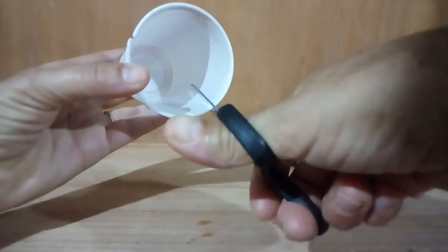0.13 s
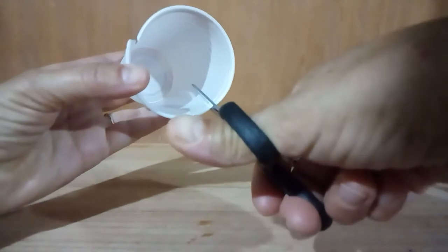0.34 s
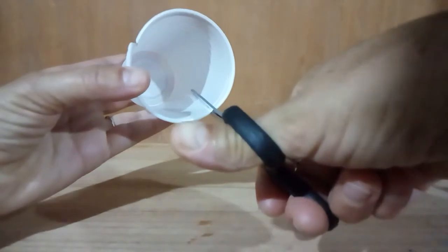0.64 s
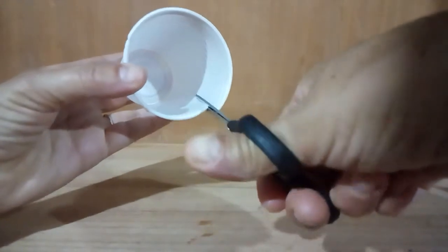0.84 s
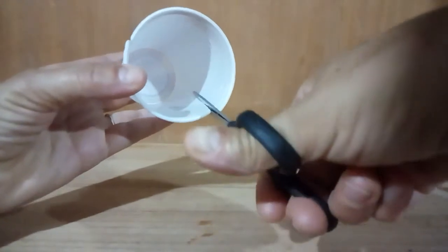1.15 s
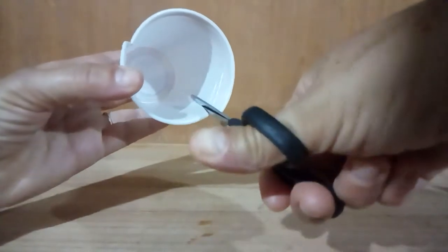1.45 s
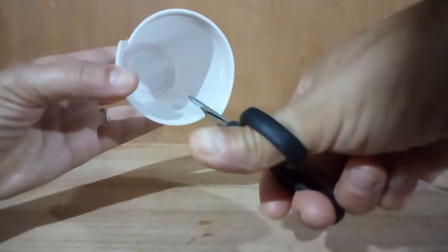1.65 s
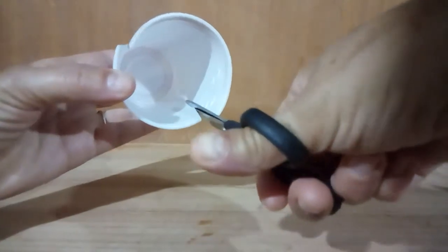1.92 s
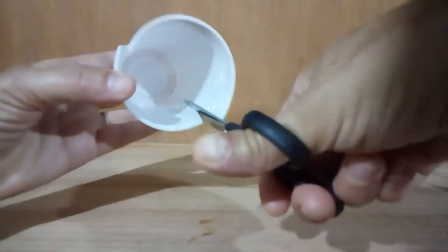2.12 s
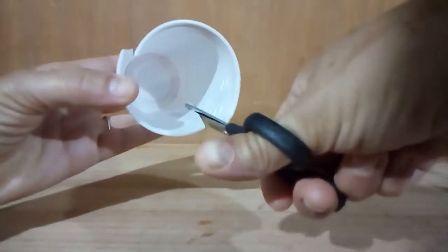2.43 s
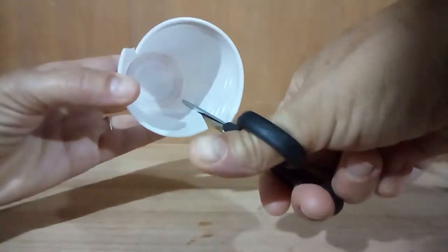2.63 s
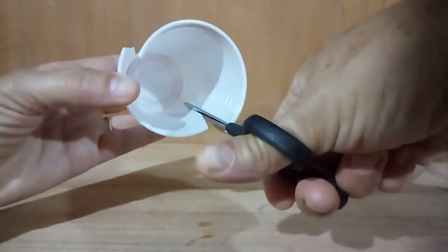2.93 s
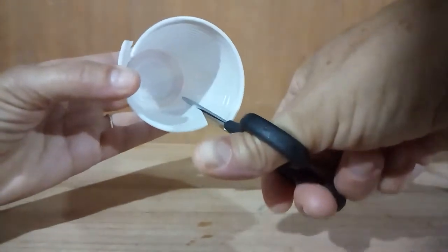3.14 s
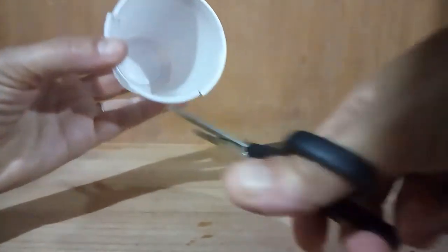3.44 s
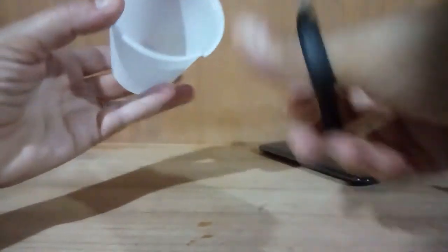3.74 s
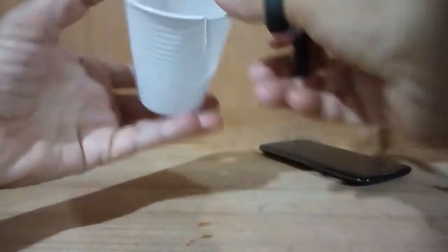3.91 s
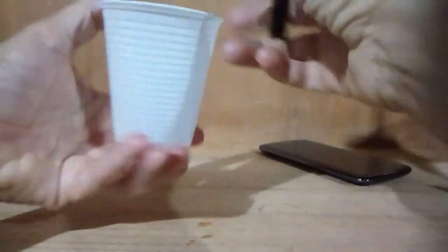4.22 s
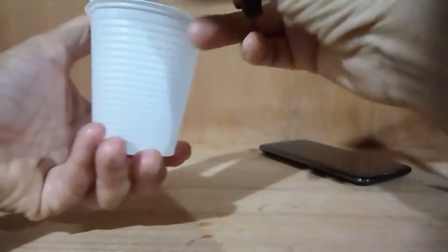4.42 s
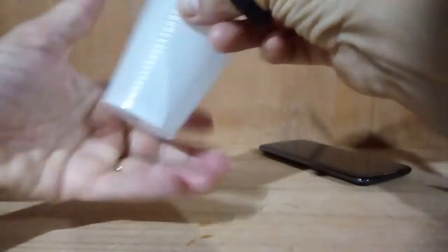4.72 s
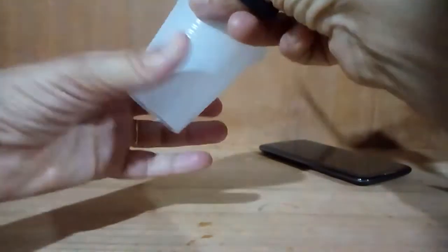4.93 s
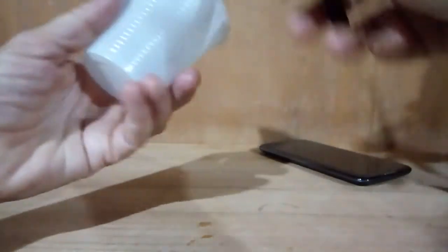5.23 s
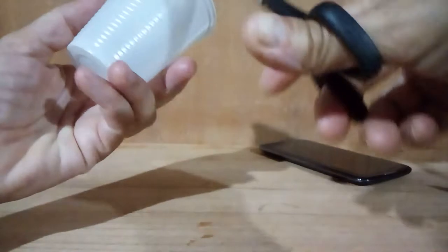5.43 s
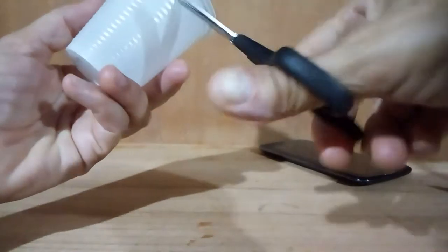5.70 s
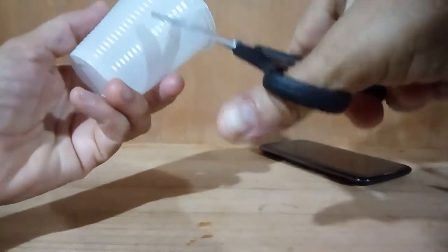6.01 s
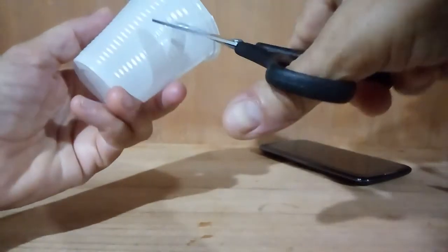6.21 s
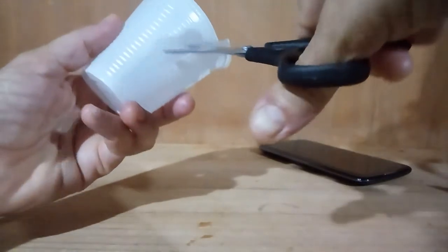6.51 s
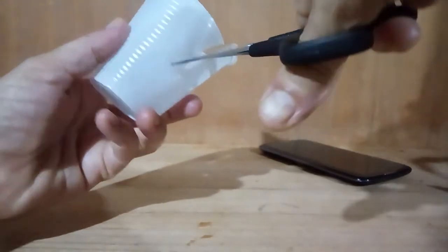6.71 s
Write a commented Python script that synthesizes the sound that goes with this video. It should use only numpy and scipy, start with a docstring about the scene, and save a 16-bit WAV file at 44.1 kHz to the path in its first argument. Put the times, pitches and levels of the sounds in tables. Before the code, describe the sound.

A soft fan-like drone with low, wavering tones fills a small room throughout, with a faint hiss. At about 0.9 seconds small scissors bite into a thin plastic cup close to the microphone with a sharp crack. Quick runs of bright snaps and crackles follow until 2 seconds, then lighter snips and scraping as blades and fingers stick and slip over the ribs. At 3 seconds comes a loud snap and a very brief low hum from the cup, followed by the densest, loudest cracking from 3.2 to 3.5 seconds. The background dips slightly after the loud snaps. Faint ticks and rubbing continue until about 4.6 seconds, when a duller cluster of crackles starts, lasting to around 5.5. More rubbing and scattered snaps come near 5.9 and 6.1, with a stronger snap at 6.4 and a few small ones near 6.8 seconds.

```python
"""A fan-like drone with soft tones fills a small room; then small scissors snip a thin plastic cup
close to the microphone. The wall snaps and buckles in runs of tiny cracks, and blades and fingers
stick and slip over its ribs. Both ring the same cup: base, hollow, flank and thin wall.
Midway the base hums briefly; later the snaps and rubbing are duller, their low ring near the
drone's pitch. The microphone hisses faintly, and its gain control ducks after loud snaps."""
import sys
import numpy as np
from scipy import signal
from scipy.io import wavfile
from scipy.ndimage import uniform_filter1d

SR = 44100
rng = np.random.default_rng(int(sys.argv[2]) if len(sys.argv) > 2 else 0)


def wav_record(signal):
    """Record a signal, one row per channel, as 16-bit PCM in the file named by sys.argv[1]."""
    frames = np.transpose(np.atleast_2d(signal))
    bounded = np.clip(frames, -1, 1)
    # unit amplitude maps onto the largest positive 16-bit level
    quanta = np.round(bounded * 32767).astype(np.int16)
    wavfile.write(sys.argv[1], SR, quanta)


N = 302526

# The cup's modes, zone by zone from low to high. Each row: pitch in Hz, width in Hz, level in dB.
BASE_MODES = [(339, 58, -5.5), (459.4, 47, -3), (571, 183, 2.5), (787, 190, 6.5), (970, 100, -2.5)]
HOLLOW_MODES = [(1050, 61, -7.5), (1298, 71, 3.5), (1486, 91, -1), (1678, 90, -0.5), (1854, 460, -3)]
FLANK_MODES = [(2062, 570, 0), (2580, 530, -1), (2897, 290, -1), (3154, 210, -6.5), (3560, 216, -2.5),
               (3918, 440, -1), (4370, 490, 2.5)]
WALL_MODES = [(4790, 495, -1.5), (5485, 254, -2), (5880, 210, -3), (6230, 300, -1.5), (6730, 314, -1),
              (7410, 150, -17)]
# After DULL_FROM_S the snaps and rubbing are duller, their low ring near the drone's pitch.
DULL_FROM_S, BASE_EARLY_HZ, BASE_LATE_HZ = 3.48, 784, 380


def gain_of(db):
    """Turns dB into amplitude."""
    return 10 ** (np.asarray(db) / 20)


def unit_rms(x):
    """Scales to rms 1."""
    return x / np.sqrt(np.mean(x ** 2) + 1e-20)


def curve_at(points, hz):
    """Reads a curve on a log-frequency axis."""
    f, value = np.transpose(points)
    return np.interp(np.log(hz + 1), np.log(f + 1), value)


def drift(count, samples):
    """Rows of slow random movement of rms 1, smoothed over the given number of samples."""
    white = rng.standard_normal((count, N))
    return unit_rms(uniform_filter1d(uniform_filter1d(white, samples), samples))


def shaped_noise(spectrum, rms_db, patchy_db):
    """Coloured noise in which patches of the spectrum swell and fade."""
    hz = np.fft.rfftfreq(2048, 1 / SR)
    real, imag, patches = rng.standard_normal((N // 512 + 5, 1025, 3)).T
    patches = unit_rms(uniform_filter1d(uniform_filter1d(patches, size=14, axis=0), size=12, axis=1))
    frames = (real + 1j * imag) * gain_of(curve_at(spectrum, hz)[:, None] + patchy_db * patches)
    return gain_of(rms_db) * unit_rms(signal.istft(frames, nperseg=2048, noverlap=1536)[1][:N])


def drone():
    """A fan-like bed of smooth noise, with soft tones whose strength and phase wander."""
    # The bed's colour. Each row: frequency in Hz, relative level in dB.
    spectrum = [(12, -51), (20, -17.5), (123, 3), (250, -14.5), (370, -6.5), (418, -4.5), (521, -12),
                (771, -15.5), (1170, -22), (3890, -30), (5900, -26), (7000, -34), (9100, -69),
                (15400, -120)]
    # The tones. Each row: pitch in Hz, width of the waver in Hz, unsteady share, rms level in dB.
    tones = [(122.4, 13, 1, -65), (328, 76, 1., -66.5), (424.4, 30, .4, -61.5)]
    out, t = shaped_noise(spectrum, rms_db=-58.5, patchy_db=2.5), np.arange(N) / SR
    for hz, waver_hz, unsteady, db in tones:
        pole = np.exp(-np.pi * waver_hz / SR)
        wander = signal.lfilter([1], [1, -2 * pole, pole ** 2], rng.standard_normal((2, N)))
        waver = (unit_rms(wander[0]) + 1j * unit_rms(wander[1])) / np.sqrt(2)
        swell = gain_of(2.7 * drift(count=1, samples=6000)[0])
        envelope = (1 - unsteady + unsteady * waver) * swell
        out += gain_of(db) * unit_rms((envelope * np.exp(2j * np.pi * hz * t)).real)
    return out


def ticks(shape, density, spread_db):
    """Scattered ticks of random sign and uneven size."""
    size = gain_of(spread_db * np.minimum(rng.exponential(1, shape), 5))
    return size * rng.choice([-1., 1.], shape) * (rng.random(shape) < density)


def ring(modes, near_hz=None):
    """Each mode's ring after one tick, a row each; modes close to near_hz are favoured."""
    hz, width, db = np.transpose(modes)[:, :, None]
    if near_hz:
        db = db - 1.4 * abs(hz - near_hz) / width
    t = np.arange(2048) / SR
    polarity = (-1) ** np.arange(len(modes))[:, None]
    attack = 1 - np.exp(-(t / .00025) ** 2)  # the plastic gives for an instant
    return attack * polarity * gain_of(db) * np.exp(-np.pi * width * t) * np.sin(2 * np.pi * hz * t)


def rasp(brightness):
    """The bright edge of a tick, which dies without ringing; brightness 0-1 blends slip into crack."""
    # The colours of a hard crack and of a gentle slip. Each row: frequency in Hz, level in dB.
    crack = [(4410, -30), (7500, 0), (7890, -4), (11500, -21), (13500, -25), (14000, -17), (15300, -10),
             (16000, -14), (16700, -34)]
    slip = [(4400, -30), (7500, 0), (8500, -8), (10000, -19), (12000, -30), (14000, -36), (15000, -30),
            (16000, -36), (16700, -55)]
    hz = abs(np.fft.fftfreq(4096, 1 / SR))
    colour = gain_of(brightness * curve_at(crack, hz) + (1 - brightness) * curve_at(slip, hz))
    minimum_phase = np.exp(np.conj(signal.hilbert(np.log(colour))))  # keeps the attack sharp
    return np.fft.ifft(minimum_phase).real[None, :2048]


def snaps():
    """The wall snaps: each run of tiny cracks swells, dies and shakes the zones of the cup."""
    # Each row: start in seconds, rough peak level of the thin wall in dB, rms levels of base, hollow
    # and flank in dB relative to it, pitch of the wall in Hz.
    hits = [(0.296, -55.5, -15, -13, -11.5, 5690), (0.879, -16, -28, -38, -23, 6710),
            (0.8823, -7, -30.5, -25, -25.5, 6400), (0.8877, -14, -43, -19.5, -15, 5650),
            (1.1198, -21, -30.5, -29, -15, 5360), (1.1448, -14.5, -25.5, -14, -15, 6700),
            (1.1682, -20.5, -23, -41, -16, 6640), (1.1972, -21.5, -28, -40, -17, 6330),
            (1.2037, -6, -56, -44, -27, 6600), (1.2826, -25, -13, -7, -12.5, 6070),
            (1.291, -17, -25.5, -15, -19, 6700), (1.3195, -19, -29, -50, -25.5, 6400),
            (1.403, -35.5, -13, -18, -18, 5690), (1.4212, -34.5, -10, -16, -8, 6530),
            (1.4266, -18.5, -29, -20, -33, 5650), (1.492, -37, -8, -9.5, -16, 6130),
            (1.5882, -55, 9.5, 4.5, -2.5, 5670), (1.6724, -15.5, -17, -11.5, -6.5, 6100),
            (1.8871, -21.5, -19, -13.5, -12, 6060), (1.9023, -42.5, -15, -3, -8.5, 6190),
            (1.9905, -15, -17.5, -22, -20.5, 6000), (2.0176, -21, -17.5, -26, -19, 5900),
            (2.4012, -35.5, -36, -37, -35, 6170), (2.4364, -33, -24, -27, -17.5, 6350),
            (2.6191, -25.5, -32, -22.5, -25.5, 5300), (2.668, -32.5, -9.5, -10.5, -13, 6260),
            (2.684, -26, -20.5, -31, -18.5, 6200), (3.0049, -5.5, -32.5, -22.5, -22.5, 6220),
            (3.244, -20.5, -26, -22.5, -22, 6400), (3.272, -5.5, -31, -26.5, -26, 5600),
            (3.2983, -14.5, -31, -27, -17, 4740), (3.3093, -6, -31, -29, -22, 6400),
            (3.3149, -3.5, -29, -21, -21.5, 5400), (3.3492, -16, -19.5, -11, -13.5, 5630),
            (3.3591, -8.5, -36, -20, -22, 6780), (3.4054, -15, -20.5, -13, -18, 5500),
            (3.44, -13.5, -26, -30, -10.5, 5730), (3.4945, -21.5, -38, -27, -16.5, 5340),
            (3.6173, -45, -23, -41, -23.5, 7000), (3.743, -42, -21, -32, -21, 5980),
            (3.7988, -38.5, -33, -38, -26, 5950), (3.918, -41, -19.5, -27.5, -12.5, 5760),
            (4.6187, -28.5, -44, -26.5, -23.5, 6310), (4.6558, -37.5, -38, -25, -14, 6700),
            (4.705, -25, -45, -20, -27, 7400), (4.7122, -32, -16.5, -7, -3, 5200),
            (4.7352, -23.5, -26, -17.5, -20, 5160), (4.7784, -26.5, -26, -26, -27, 5700),
            (4.8101, -31.5, -33, -18, -9.5, 4700), (4.9066, -22, -30, -23, -14.5, 5330),
            (4.9364, -27, -24, -23, -17, 5770), (5.0606, -29, -19, -16.5, -15, 6000),
            (5.1236, -30.5, -21, -26, -15, 6000), (5.1324, -13.5, -30.5, -18, -14.5, 5500),
            (5.242, -52.5, -14, 0.5, -4, 5400), (5.3135, -36.5, -45, -38, -15, 6300),
            (5.443, -29, -27.5, -16.5, -14, 5380), (5.7823, -38, -38, -18, -23, 5420),
            (5.913, -26.5, -24, -12.5, -27, 5910), (5.9231, -27.5, -13, -13.5, -14, 4890),
            (6.096, -24, -33.5, -31, -21, 4700), (6.2672, -56, -12.5, -6, -8, 5470),
            (6.339, -55, -5, 4, -2.5, 4830), (6.3715, -14.5, -16.5, -13.5, -17.5, 6500),
            (6.7551, -39.5, -26, -10.5, -8, 5760), (6.774, -30.5, -26.5, -21, -12.5, 5640),
            (6.7894, -36, -18, -28, -11, 5700)]
    crackle_t60_s, rasp_db = 0.041, -30.5  # rasp relative to the wall
    late_dulling, late_rasp_db = 0.45, -2.5  # late snaps have a darker, softer rasp
    out, t = np.zeros(N + 8192), np.arange(4096) / SR
    cracks = ticks((len(hits), 5, 4096), density=0.28, spread_db=3.)
    for (start, db, base_db, hollow_db, flank_db, wall_hz), crack in zip(hits, cracks):
        late = start > DULL_FROM_S
        edge = rasp(np.clip((db + 25) / 14 - late_dulling * late, 0, 1))  # hard snaps are brighter
        rise_s = 0.00034 * gain_of(-.35 * db)  # and start more abruptly
        cup = (ring(BASE_MODES, BASE_LATE_HZ if late else BASE_EARLY_HZ),
               ring(HOLLOW_MODES, near_hz=1390), ring(FLANK_MODES, near_hz=0.61 * wall_hz),
               edge, ring(WALL_MODES, wall_hz))
        crackle = crack * np.minimum(t / rise_s, 1) * gain_of(-60 * t / crackle_t60_s)
        shaken = signal.fftconvolve(crackle, [zone.sum(axis=0) for zone in cup], axes=1)
        strength = np.sqrt(np.mean(shaken[:, :700] ** 2, axis=1))
        strength[-1] = 3.24 * np.sqrt(np.mean(shaken[-1, :300] ** 2))  # the wall's opening crest
        zone_db = np.array([base_db, hollow_db, flank_db, rasp_db + late_rasp_db * late, 0])
        at = round(start * SR)
        out[at:at + shaken.shape[1]] += gain_of(db + zone_db) / strength @ shaken
    return out[:N]


def wall_sheen(x):
    """Sharp modes of the thin wall add a fine ring to whatever shakes the cup."""
    # Each row: pitch in Hz, width in Hz (widened to at least 25), level in dB over the passing sound.
    sharp_modes = [(1532, 23, 0), (1740, 20, -1), (2090, 30, 4), (2596, 32, 1), (2998, 34, 0),
                   (3250, 34, -1), (3478, 23, 0), (4227, 31, 0.5), (4783, 40, 2), (5150, 31, 3),
                   (5360, 20, -3.5), (5820, 27, 2.5), (6140, 79, -1.5), (6480, 26, 2)]
    hz, width, db = np.transpose(sharp_modes)[:, :, None]
    t, width = np.arange(4096) / SR, np.maximum(width, 25)
    decays = gain_of(db) * 2 * np.pi * width / SR * np.exp(-np.pi * width * t)
    ringing = (decays * np.cos(2 * np.pi * hz * t)).sum(axis=0)
    return x + signal.oaconvolve(x, ringing)[:N]


def room(x):
    """Sparse reflections off the walls of a small room, the treble dying first."""
    # Each row: frequency in Hz, time to fade by 60 dB in seconds.
    decay_times = [(300, 0.26), (1500, 0.24), (5500, 0.17), (12000, 0.14)]
    taps, slots = np.zeros((3, SR // 2)), np.arange(200, SR // 2 - 20, 20)
    arrivals = slots + rng.integers(0, 20, (3, len(slots)))
    np.put_along_axis(taps, arrivals, rng.choice([-1., 1.], arrivals.shape), axis=1)
    hz, t, frames = signal.stft(taps, SR, nperseg=256)
    fade = gain_of(-60 * t / curve_at(decay_times, hz)[:, None])
    tails = signal.istft(frames * fade, SR, nperseg=256)[1]
    tails /= np.linalg.norm(tails[0])
    # Three random tails alternate rapidly so the echo stays smooth, without a fixed ring.
    turns = np.sqrt(2 / 3) * abs(np.cos(np.pi * (np.arange(N) / 300 + np.arange(3)[:, None] / 3)))
    return signal.fftconvolve(turns * x, tails, axes=1)[:, :N].sum(axis=0)


def drag():
    """Blades and fingers stick and slip over the ribs: dense ticks in clumps ring the cup."""
    # Each row: strongest moment, rise and fall in seconds, rms level of the thin wall in dB,
    # levels of base, hollow and flank in dB relative to it.
    strokes = [(0.938, 0.042, 0.12, -35.5, -13.5, -16, -7.5), (1.265, 0.055, 0.035, -36.5, -10, -9.5, -5.5),
               (1.705, 0.039, 0.12, -46, -6, -7, 6.5), (1.975, 0.034, 0.024, -56, 5.5, 2, -1),
               (2.235, 0.067, 0.062, -31.5, -8, -12.5, -11.5), (2.442, 0.023, 0.023, -42.5, -6, -8, -10.5),
               (2.48, 0.043, 0.024, -46.5, -1, -8, -4.5), (2.689, .06, 0.1, -40.5, -7, -6.5, -7),
               (2.94, .03, 0.058, -54, -8, -16, -14), (3.065, 0.066, 0.1, -34, -14.5, -13.5, -9),
               (3.236, 0.051, 0.029, -52.5, 0, -6, -6), (3.37, 0.022, 0.043, -35.5, -3, -12, 2.5),
               (3.428, .04, 0.078, -22.5, -17, -10, -4), (3.77, 0.088, 0.053, -54.5, 0.5, -12, -8),
               (3.946, 0.03, 0.062, -44.5, -12, -18, -13.5), (4.05, 0.12, 0.16, -66.5, 2, -9, -5),
               (4.199, 0.21, 0.12, -62.5, -4, -11.5, -4), (4.634, 0.021, 0.067, -43, -26.5, -6.5, -5),
               (4.702, 0.014, 0.09, -43.5, -7, -8, -4.5), (4.79, 0.024, .13, -44.5, -14, -10.5, -12),
               (5.041, 0.11, 0.037, -42, -12, -12, -7), (5.164, 0.023, 0.1, -48, -4.5, -13, -4),
               (5.38, 0.15, 0.14, -45.5, -15, -14, -8), (5.57, 0.091, 0.15, -61, -18, -20, -2),
               (5.819, 0.036, .04, -55.5, -10, -11.5, -9), (5.899, 0.047, .04, -36.5, -15.5, -15.5, -10),
               (5.975, 0.03, 0.068, -44.5, -22, -15, -10.5), (6.107, 0.095, 0.053, -38.5, -14, -7.5, -5),
               (6.209, 0.036, 0.026, -47, -2, -1.5, -4), (6.45, 0.052, 0.14, -56.5, -3.5, -2, -4),
               (6.615, 0.071, 0.073, -57, -6, 0.5, -3.5), (6.73, 0.063, 0.023, -59, -14, 0.5, -8.5),
               (6.777, 0.032, 0.053, -46.5, -7.5, -0.5, -4), (6.855, 0.035, .03, -53.5, -2, -9, -2)]
    fade_db, roundness = -23.5, 1.35  # pressure lost over one rise or fall; shape of the top
    rasp_db = -21.5  # relative to the wall
    t = np.arange(N) / SR
    slips = ticks(N, density=0.36, spread_db=-0.5) * gain_of(1.3 * drift(count=1, samples=100))
    cup = (ring(BASE_MODES), rasp(brightness=0.93),  # early strokes
           ring(BASE_MODES, BASE_LATE_HZ), rasp(brightness=0.26),  # late strokes
           ring(HOLLOW_MODES), ring(FLANK_MODES), ring(WALL_MODES))
    rubbed = []
    for zone in cup:
        contact = gain_of(2.94 * drift(count=len(zone), samples=1600))  # modes come and go as it moves
        ringing = signal.oaconvolve(slips, zone, axes=1)[:, :N]
        rubbed.append(unit_rms((contact * ringing).sum(axis=0)))
    pressure = np.zeros((len(cup), N))
    for peak_s, rise, fall, db, base_db, hollow_db, flank_db in strokes:
        span = slice(max(round((peak_s - 2 * rise) * SR), 0), round((peak_s + 2 * fall) * SR))
        from_peak = abs(t[span] - peak_s) / np.where(t[span] < peak_s, rise, fall)
        zone_gain = gain_of([base_db, rasp_db, base_db, rasp_db, hollow_db, flank_db, 0])
        silent_pair = slice(2, 4) if peak_s < DULL_FROM_S else slice(0, 2)
        zone_gain[silent_pair] = 0
        pressure[:, span] += zone_gain[:, None] * gain_of(db + fade_db * from_peak ** roundness)
    return (pressure * rubbed).sum(axis=0)


def base_hum():
    """A low mode of the base hums until a finger damps it."""
    # In order: start and end in seconds, pitch in Hz, rms level in dB.
    note = (3.006, 3.11, 447, -46)
    start, end, hz, db = note
    t = np.arange(N) / SR
    held = uniform_filter1d(1. * (t > start) * (t < end), size=500)
    return np.sqrt(2) * gain_of(db) * held * np.sin(2 * np.pi * hz * t)


def scene():
    """The close cup, too small to radiate bass, with its echo in the room and the drone behind."""
    cup = wall_sheen(snaps() + drag()) + base_hum()
    near = signal.lfilter(*signal.butter(2, 260., "high", fs=SR), cup)
    return (near + gain_of(-12.5) * room(near) + drone())[None]


def record(dry):
    """The microphone adds hiss, ducks just after loud snaps, recovers slowly and cuts the top treble."""
    # The colour of the hiss. Each row: frequency in Hz, relative level in dB.
    hiss_spectrum = [(4710, -46), (8000, -16), (9310, -13), (10700, -14), (13500, -10), (15200, 1),
                     (16200, -6), (16400, -22), (16700, -29)]
    threshold_db, duck_db_per_db, release_db_per_s, cutoff_hz = -21.5, 0.24, 33.0, 16500
    mic = dry + shaped_noise(hiss_spectrum, rms_db=-83, patchy_db=0)
    power_db = 10 * np.log10(abs(uniform_filter1d(mic[0] ** 2, size=220, origin=100)) + 1e-12)
    release = np.arange(N) * release_db_per_s / SR
    held_db = np.maximum.accumulate(power_db + release) - release  # jumps to each peak, then sinks
    over_db = np.maximum(held_db - threshold_db, 0)
    ducked = mic / gain_of(duck_db_per_db * uniform_filter1d(over_db, size=300, origin=149))
    lowpass = signal.firwin(511, cutoff_hz, window=("kaiser", 9), fs=SR)
    return signal.oaconvolve(ducked, lowpass[None], "same")


dry = scene()
out = record(dry)
wav_record(out)
```